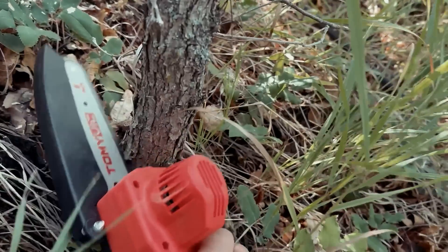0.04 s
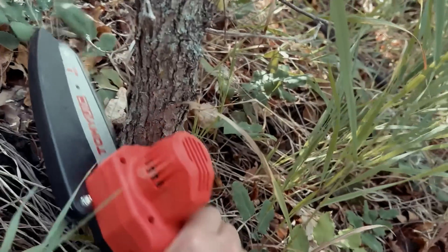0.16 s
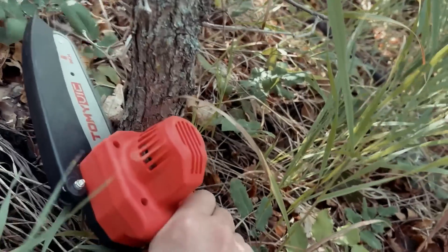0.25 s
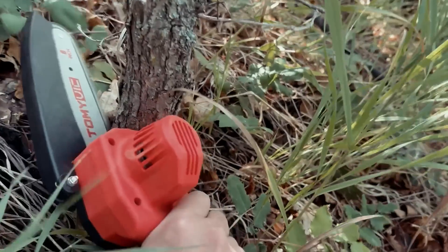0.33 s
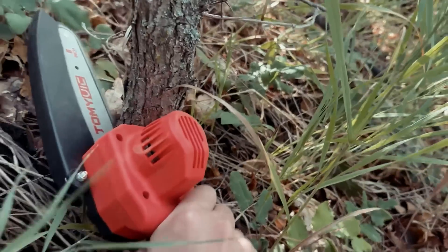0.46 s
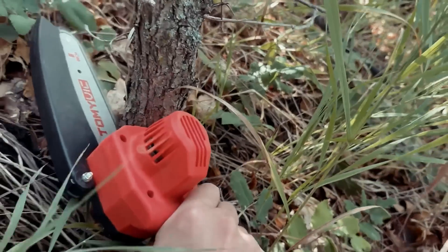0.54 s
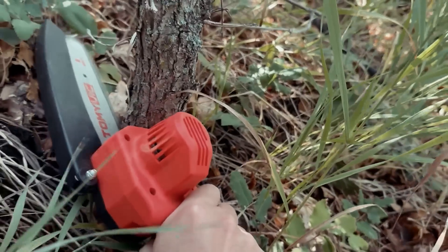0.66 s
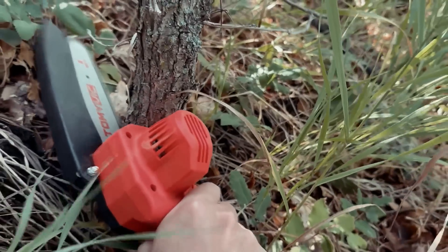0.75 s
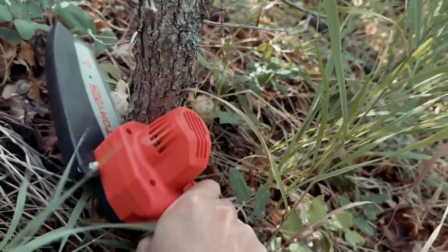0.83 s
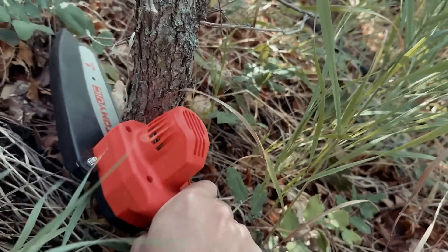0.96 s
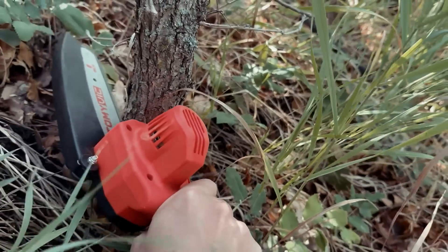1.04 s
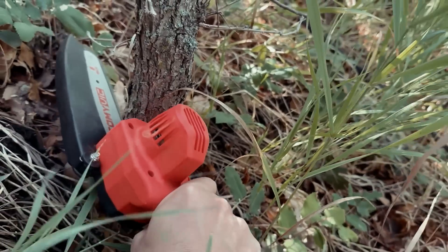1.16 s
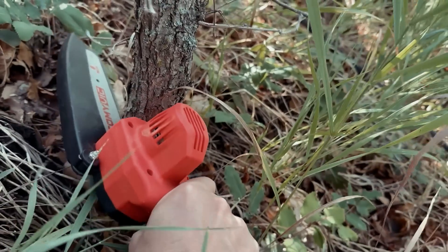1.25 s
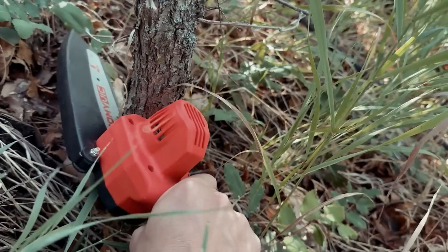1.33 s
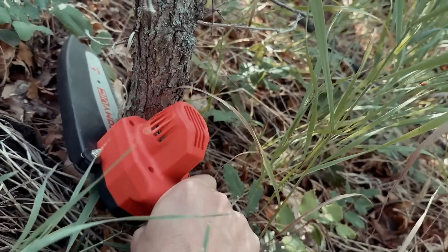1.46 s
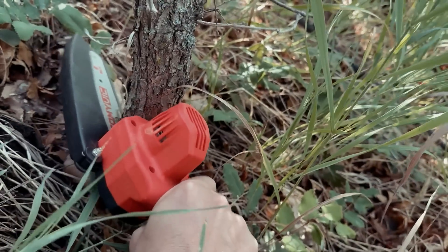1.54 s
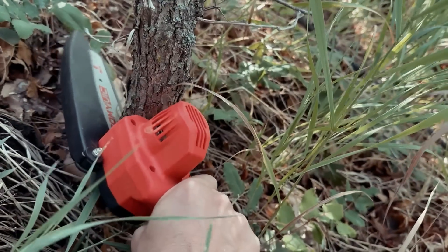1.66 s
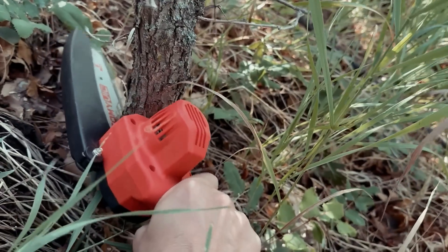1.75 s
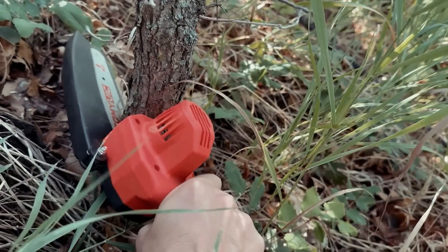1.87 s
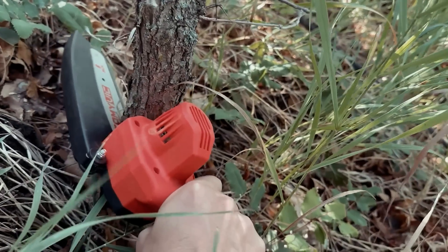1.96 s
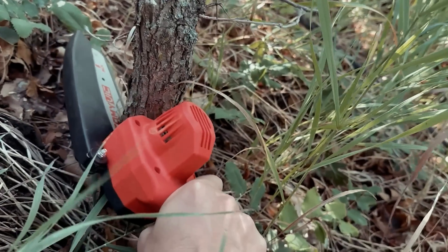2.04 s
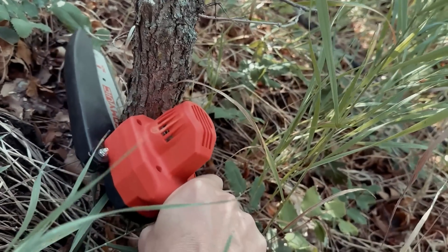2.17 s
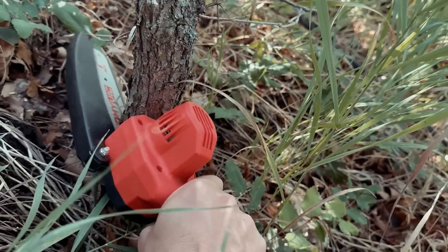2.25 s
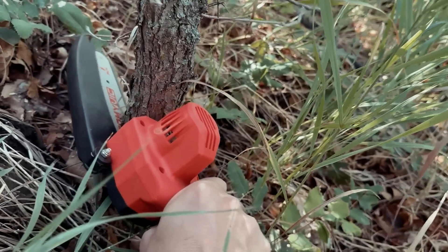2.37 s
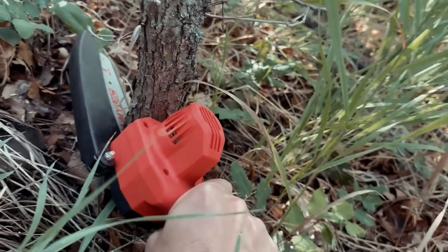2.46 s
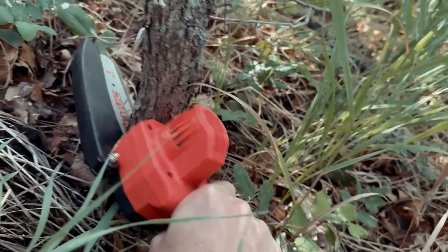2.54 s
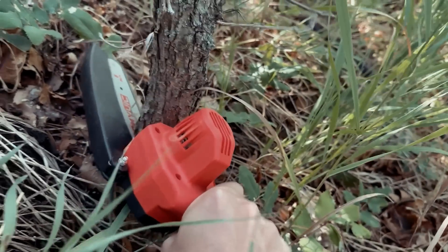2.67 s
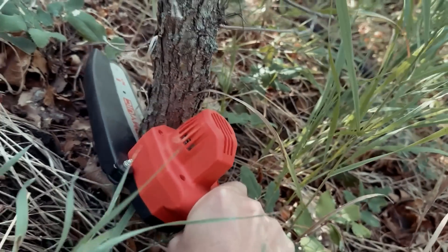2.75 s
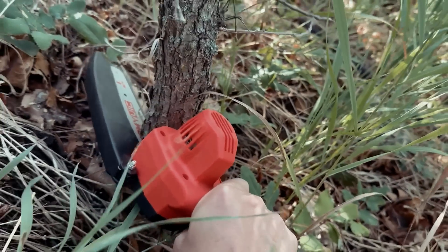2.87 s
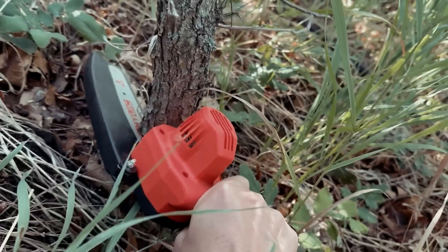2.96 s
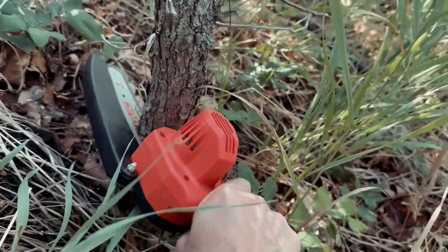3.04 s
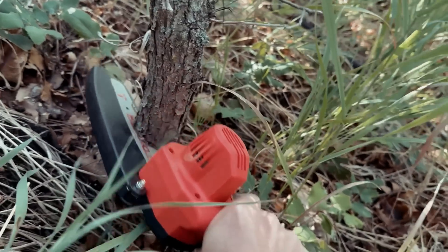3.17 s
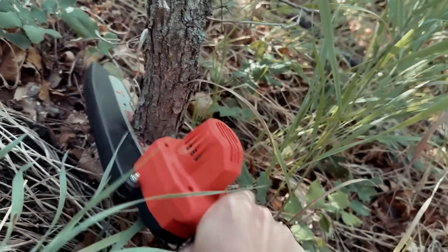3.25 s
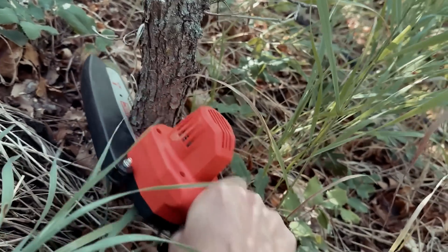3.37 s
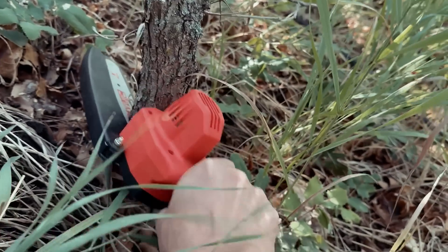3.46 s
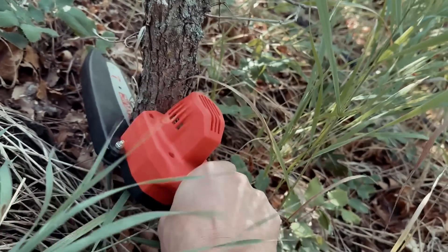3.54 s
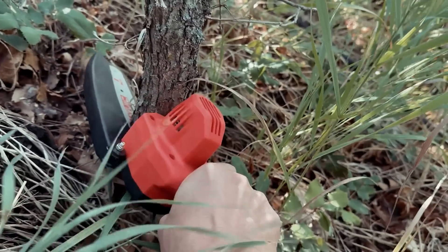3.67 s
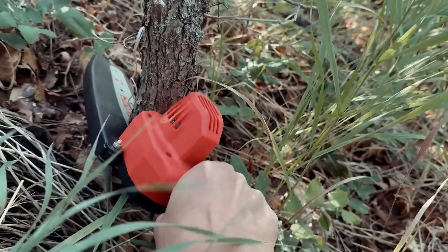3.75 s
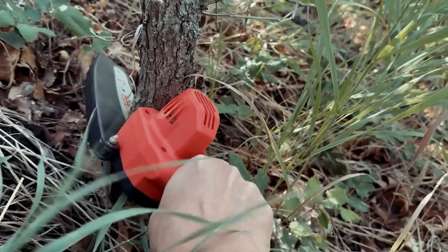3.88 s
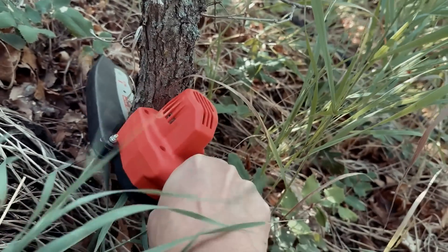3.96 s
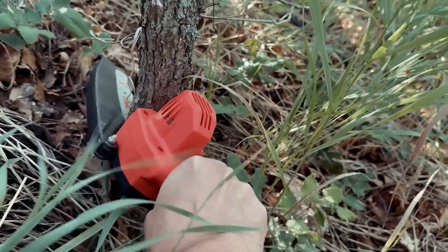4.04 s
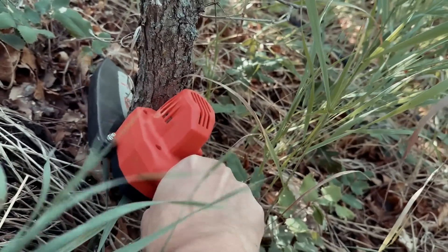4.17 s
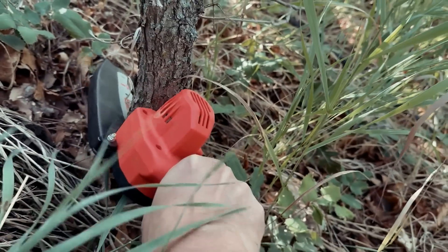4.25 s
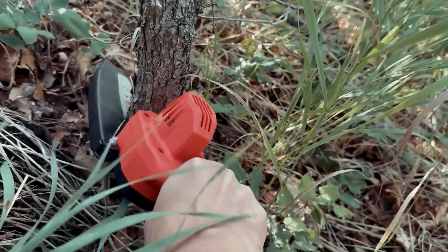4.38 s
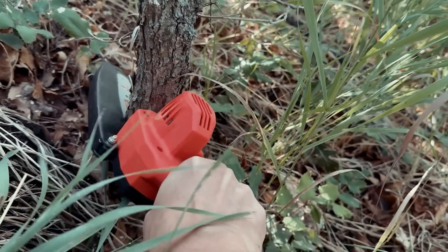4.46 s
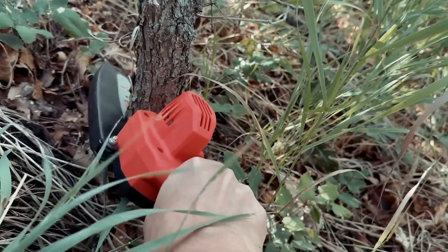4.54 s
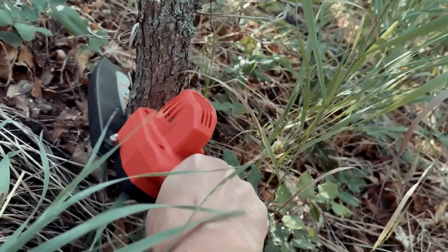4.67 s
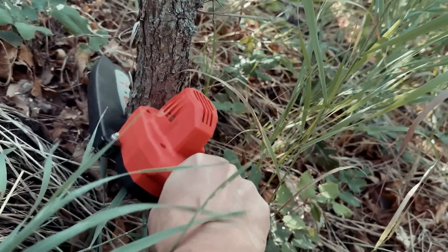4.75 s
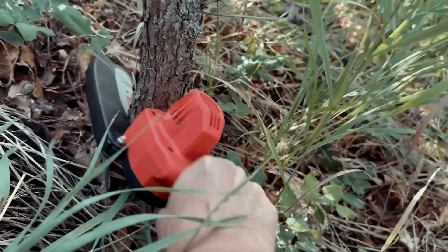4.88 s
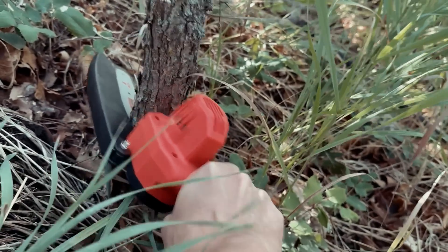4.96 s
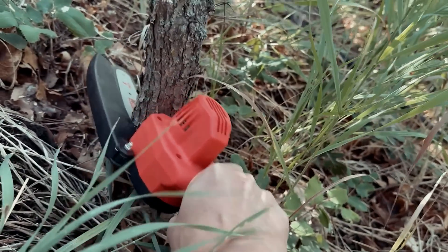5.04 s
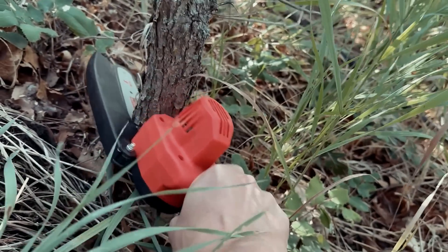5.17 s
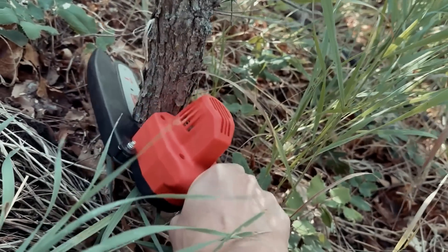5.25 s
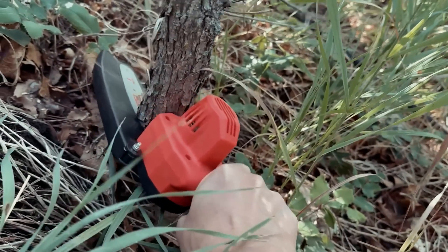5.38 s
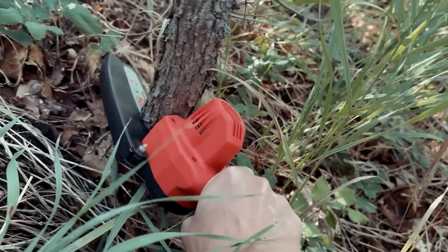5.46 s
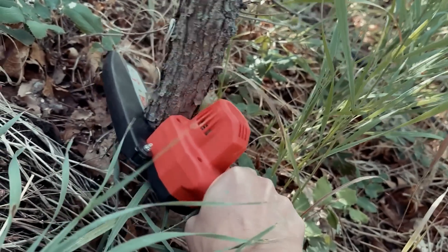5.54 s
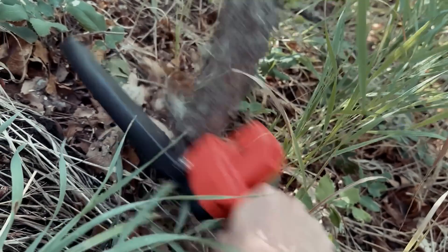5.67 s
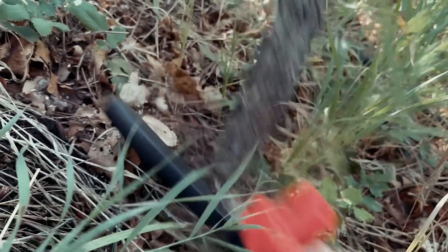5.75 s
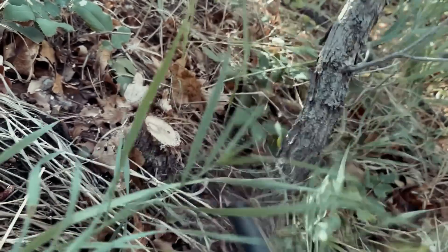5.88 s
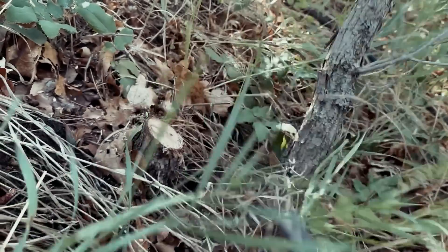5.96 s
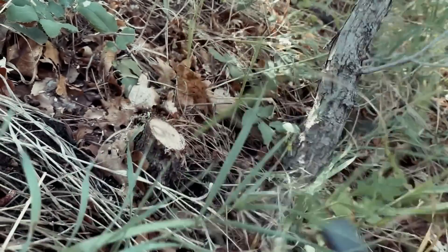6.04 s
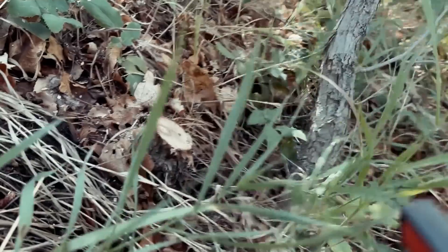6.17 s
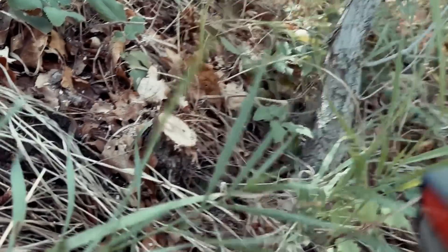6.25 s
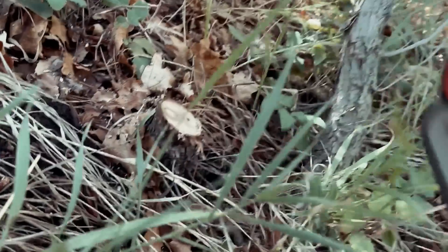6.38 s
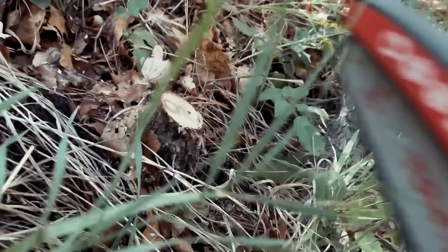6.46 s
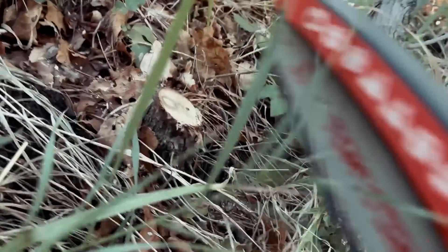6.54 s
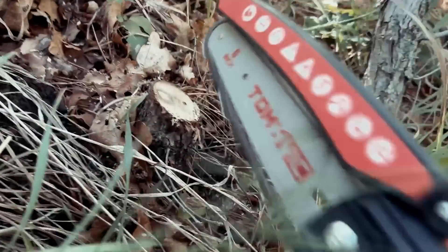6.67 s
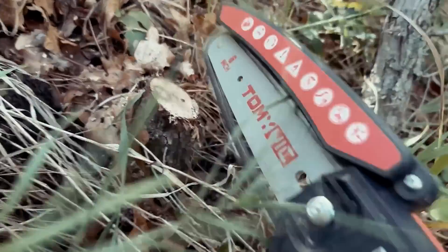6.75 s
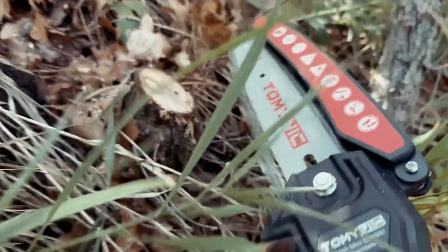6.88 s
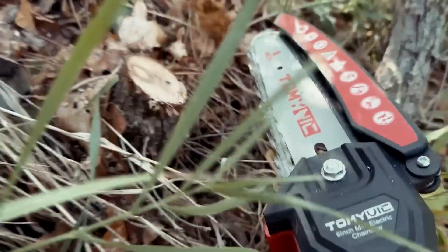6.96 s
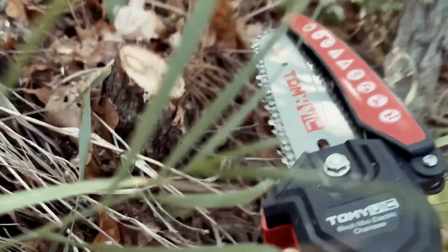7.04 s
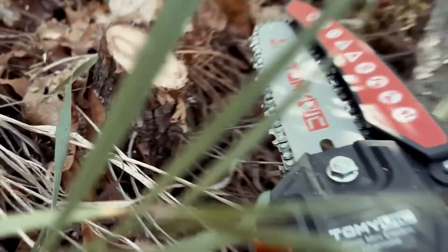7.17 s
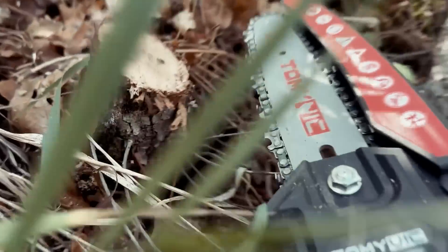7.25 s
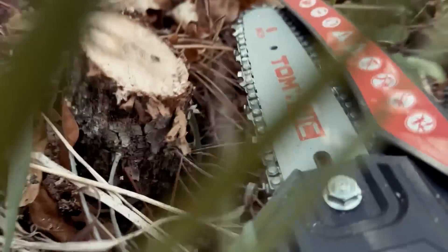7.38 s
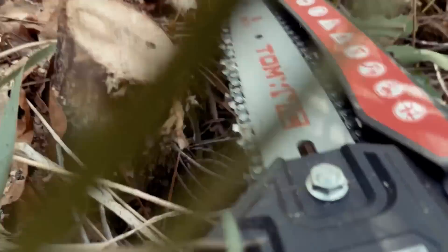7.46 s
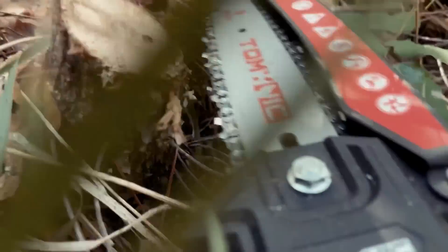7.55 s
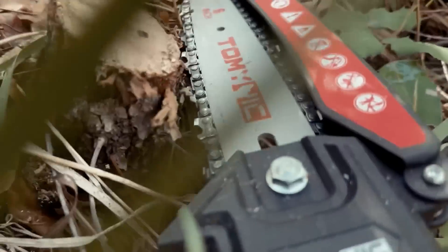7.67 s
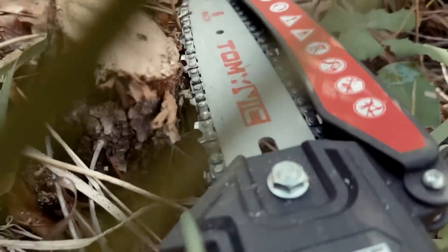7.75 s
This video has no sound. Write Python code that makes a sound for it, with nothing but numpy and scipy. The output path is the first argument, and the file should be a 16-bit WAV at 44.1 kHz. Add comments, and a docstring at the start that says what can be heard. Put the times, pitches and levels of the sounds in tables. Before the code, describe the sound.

Heard from very near in a quiet outdoor spot, a little electric chainsaw gnaws through a thin trunk with a bright metallic rattle, woody knocks and a low shudder, briefly skidding and biting again. The wood sound drops away as the cut finishes, and the chain clatters and whirrs down to a stop. Soft, tiny snaps of dry grass brushing the saw follow, over a very faint far hum.

```python
"""A chain rattles and slaps over its bar as a small battery chainsaw gnaws through a sapling close by.
Impacts excite the resonances of chain, housing and trunk; the cutters bite in throbbing groups,
knock hollow notes from the wood and make it shudder. The trunk parts at 5.6 s and the chain coasts
to rest with a falling whirr. Then dry grass rustles in tiny snaps over a faint, far hum."""
import sys
import numpy as np
from scipy import signal
from scipy.fft import rfft, irfft, next_fast_len
from scipy.io import wavfile
from scipy.ndimage import map_coordinates

SR = 44100
rng = np.random.default_rng(int(sys.argv[2]) if len(sys.argv) > 2 else 0)


def dump_mix(stems):
    """Bounce the given channels to the path in sys.argv[1] as a 16-bit WAV at rate SR."""
    frames = np.atleast_2d(stems).T  # one column per channel
    limited = np.clip(frames, -1, 1)  # hard clip at full scale
    pcm = np.round(limited * 32767).astype(np.int16)
    wavfile.write(sys.argv[1], SR, pcm)


N = 344406

# Effort of the saw; after the cut, bite is the free chain's drag: time_s, chain_db, bite_db
SAW_LEVELS = [(0.0, -25, -40.5), (0.3, -24.5, -36), (0.67, -29.5, -38.5), (0.89, -27.5, -38.5),
              (1.19, -30, -37.5), (1.94, -30.5, -40.5), (2.73, -31.5, -42), (3.02, -30.5, -44.5),
              (3.19, -28.5, -36), (3.3, -31.5, -39), (3.55, -33, -45.5), (4.09, -32, -41),
              (4.5, -33, -42.5), (4.92, -32.5, -41), (5.2, -32, -41), (5.55, -31, -41), (5.63, -36, -41),
              (5.655, -35.5, -50.5), (5.85, -37, -52.5), (5.9, -38, -58.5), (6.12, -42.5, -66.5),
              (6.44, -41.5, -70.5), (6.555, -43, -65.5), (6.7, -47, -68), (6.82, -48, -66),
              (6.974, -54, -66), (7.1, -81, -90), (7.2, -105, -110)]
# Cutters slide off the wood and bite again: rebite_s, length_s, loss_db
CUTTER_SKIDS = [(0.712, 0.04, 2), (0.755, 0.0087, 4), (2.085, 0.027, 1.5), (2.862, 0.098, 4.5),
                (3.096, 0.071, 9.5), (3.181, 0.075, 18), (3.256, .015, 9.5), (3.328, 0.059, 5.5),
                (3.763, 0.11, 4.5), (4.017, 0.23, 3.5), (4.29, 0.12, 3.5), (4.59, .015, 4),
                (5.012, .015, 7), (5.27, .05, 3), (5.611, .03, 3), (5.66, 0.034, 5)]
# The throb slows under load and deepens with even biting: time_s, bite_rate_hz, depth_ratio
CUTTER_THROB = [(0, 41.6, .6), (.7, 34.8, 1.6), (1.2, 45, 0.6), (2.0, 42, .9), (2.6, 43.5, 1.5),
                (3.3, 48, 0.92), (3.8, 43.7, 0.11), (4.3, 42, 0.94), (5.0, 39.5, 1.5), (5.5, 45, 0.91),
                (5.7, 39, 0.32), (7.1, 50, .5)]
# Hardest slaps of links on the bar: start_s, chain_db, housing_db
LINK_CATCHES = [(0.058, -2.5, -12.5), (0.168, -11.5, -38.5), (0.449, -18, -14), (0.5541, -2, -29),
                (0.6285, -8, -35.5), (0.66, -9, -31), (0.7574, -2.5, -18), (0.788, -4.5, -28),
                (0.9776, -4.5, -32), (1.3279, -6.5, -34), (1.353, -7, -24), (1.4591, -23, -16.5),
                (1.503, -14, -23), (1.6955, -9, -27), (1.7414, -12, -18), (2.1176, -20, -16),
                (2.6274, -5.5, -17.5), (2.721, -6.5, -17), (2.83, -5, -27), (3.0977, -10, -20),
                (3.1931, -7, -25), (3.258, -10, -42), (3.492, -10, -22), (4.0649, -5, -20),
                (4.361, -12, -23), (4.453, -20, -29), (4.803, -8, -29), (4.8623, -12, -13.5),
                (5.028, -7, -17.5), (5.0669, -11, -20), (5.1895, -6, -23), (5.3584, -8, -25),
                (5.4969, -7, -23), (5.612, -7, -21), (5.6937, -21, -22), (5.8633, -24, -19.5),
                (5.9511, -34.5, -26), (6.0409, -24, -42), (6.0974, -24, -39), (6.1327, -12.5, -53),
                (6.1684, -15.5, -31), (6.248, -12.5, -27), (6.3038, -13, -28), (6.5199, -21, -38),
                (6.6191, -16, -52), (6.666, -20, -44), (6.8496, -23, -33.5)]
# Hardest knocks of cutters on the trunk: start_s, level_db, pitch_hz
TRUNK_KNOCKS = [(0.146, -24.5, 850), (0.292, -23, 845), (0.502, -27.5, 775), (0.58, -25.5, 732),
                (0.6, -19, 780), (0.659, -21.5, 685), (0.765, -18, 700), (0.793, -20.5, 710),
                (0.849, -20.5, 668), (0.999, -31, 700), (1.072, -24, 958), (1.21, -24, 703),
                (1.253, -22.5, 870), (1.275, -20.5, 736), (1.335, -22, 684), (1.491, -27, 670),
                (1.536, -22.5, 643), (1.597, -26.5, 685), (1.956, -29, 684), (2.337, -22.5, 668.7),
                (2.582, -25, 704), (2.63, -22, 690), (2.861, -27, 800), (3.045, -36, 401),
                (3.101, -30, 414), (3.212, -24.5, 910), (3.494, -26.5, 626), (3.777, -25, 670),
                (4.063, -27, 942), (4.153, -30, 910), (4.246, -27, 781), (4.638, -28, 611),
                (4.744, -22, 631), (4.791, -24.5, 899), (4.891, -23.5, 650), (5.018, -28.5, 810),
                (5.289, -35, 977), (5.357, -29, 659), (5.429, -26, 865), (5.495, -25.5, 912),
                (5.862, -38, 1090), (5.868, -36.5, 463), (5.952, -49, 457)]
# Low voices swell as the hand pushes: time_s, shudder_db, thud_db, lower_note_db
PUSH_LEVELS = [(0.0, -62, -53.5, -50), (0.08, -54.5, -47.5, -49), (0.84, -43.5, -51.5, -50),
               (1.11, -54.5, -62, -46), (1.18, -49.5, -72, -51), (1.23, -42, -54.5, -45.5),
               (1.44, -50, -60, -46.5), (2.38, -48.5, -57, -51.5), (2.43, -53, -66, -46),
               (2.67, -50.5, -50.5, -50), (3.1, -63, -76, -52.5), (3.23, -49.5, -54.5, -46.5),
               (3.33, -62, -73, -44), (3.43, -48, -51, -47), (3.76, -65.5, -78, -51),
               (3.79, -39.5, -57, -47), (4.01, -64, -88, -50.5), (4.17, -47.5, -63, -40),
               (4.57, -60, -76, -40), (4.84, -45, -54, -48.5), (5.25, -47, -55.5, -48),
               (5.34, -46, -74, -51), (5.39, -41.5, -61, -48), (5.58, -43.5, -63, -45),
               (5.68, -71, -76, -65), (5.95, -74, -88, -59)]
# Bands thrown forward and shaded as the saw moves: time_s, bright_hz, bright_db, shaded_hz, shaded_db
SAW_STANCE = [(0, 3660, 5.5, 6000, 1), (.25, 3350, 1, 5880, -3.5), (.45, 3200, 6.5, 5650, -5),
              (.8, 3320, 2, 5930, -2.5), (2.5, 3660, 1.5, 6140, -2.5), (3.2, 2650, 2, 5530, -1.5),
              (4.2, 2380, 6.5, 6000, -3), (5.6, 2600, 2.5, 5470, -2), (5.66, 5480, -1, 1800, 2),
              (5.8, 7000, 8, 1670, -4), (6.1, 5300, 6, 2013, -12), (6.2, 5200, 2.5, 3600, -3.5),
              (6.6, 4500, 2, 3450, -1), (6.68, 3300, 5.5, 2000, -8), (7.1, 3050, 9.5, 2000, -9)]
# Ring of the coasting bar: time_s, pitch_hz, width_hz, level_db
BAR_RESONANCE = [(6.15, 2500, 258, -86), (6.301, 2450, 260, -58), (6.55, 2600, 258, -65),
                 (6.68, 2500, 260, -82), (6.72, 1436, 60, -80), (6.88, 1470, 60, -70),
                 (6.98, 1450, 60, -67), (7.1, 1390, 60.1, -92)]
# Whirr of the slowing sprocket: time_s, pitch_hz, level_db
SPROCKET_WHIRR = [(6.22, 4920, -89), (6.33, 4850, -56), (6.5, 4720, -56), (6.62, 4450, -64),
                  (6.68, 4400, -85)]
# Grass brushing the saw: time_s, high_rustle_db, low_rustle_db
GRASS_LEVELS = [(7.0, -58.5, -81), (7.138, -85, -102), (7.146, -73, -88), (7.158, -82, -103),
                (7.418, -81, -105), (7.49, -72, -99), (7.5, -81.5, -105), (7.572, -68, -85),
                (7.62, -72, -90), (7.672, -81.5, -105), (7.81, -94, -105)]
# A stalk sliding on the housing: time_s, level_db
STALK_RUB = [(7.05, -83), (7.12, -108), (7.2, -90), (7.376, -109), (7.404, -82), (7.428, -109), (7.5, -109)]
# Narrow dips in the treble: centre_hz, width_hz, gain_db
TREBLE_DIPS = [(8880, 500, -5), (13400, 300, -22.5)]

# Relative spectral densities, each listing: frequency_hz, level_db
RATTLE_SPECTRUM = [(4710, -29.5), (8000, -11.5), (8880, -27.5), (9970, -4), (10700, 2.5), (12300, -4.5),
                   (13400, -8), (14900, 0.5), (16000, -0.5)]   # chain on bar; also the high rustle of grass
HOUSING_SPECTRUM = [(880, -24), (1500, -10), (1590, -10), (1890, 0), (2150, -1.5), (2750, 3), (3100, 1),
                    (3720, 3), (4720, 2.5), (5610, -0.5), (7570, 0.5), (8730, -22.5), (9000, -5),
                    (11700, -43.5), (19800, -120)]   # plastic shell and gears
TRUNK_SPECTRUM = [(280, -33.5), (480, -8.5), (523, -10), (633, -1), (702, -0.5), (941, -1), (1170, -7),
                  (1340, -2), (1540, -12.5), (1900, -5), (2470, -14.5), (4180, -120)]   # trunk under the cutters
LOWER_NOTE_SPECTRUM = [(130, -23.5), (220, -5), (307, -5.5), (384, 2), (501, -5.5), (540, -6), (700, -29.5),
                       (1190, -120)]   # the trunk's lower note
DRAG_SPECTRUM = [(150, -48), (250, -25), (423, -3), (560, -12), (813, 5.5), (980, -3), (1210, -5),
                 (1320, -1), (1450, -8), (1900, -31), (2470, -34), (4180, -120)]   # free chain in the bar's groove
SHUDDER_SPECTRUM = [(59, -35), (100, -6), (124, -10.5), (167, 2.5), (215, -8.5), (300, -7.5), (390, -27.5),
                    (660, -120)]   # trunk and housing shaking
THUD_SPECTRUM = [(24, -43), (40, -24.5), (75, 7), (125, 4.5), (160, -29.5), (280, -120)]   # deep thud under the push
GRASS_SPECTRUM = [(120, -30.5), (200, 1), (220, -13.5), (328, -5), (384, -26), (473, -13.5), (1590, -24),
                  (5850, -26), (9000, -19), (11700, -43), (19800, -120)]   # low rustle of the blades
AIR_SPECTRUM = [(18, -55), (30, -27.5), (48, -11), (71, -11.5), (88, -17), (101, -1.5), (123, -5),
                (234, -42), (404, -30.5), (478, -31), (9000, -36), (11700, -68), (19800, -120)]   # quiet outdoor air

PARTED_S, SILENT_DB = 5.64, -140   # the trunk lets go of the chain; a source at rest
SKID_ONSET_SHARE, REBITE_S = .4, .01
CHAIN_THROB_DB, WOOD_THROB_DB = 1.0, 1.66   # rms of the throb's fundamental per unit depth
BITE_LEAD_TURNS = .1508   # knocks and catches start just before the throb's crest
CATCH_SHARE, CATCH_RISE_S, CATCH_T60_S = .25, .0018, .021   # share: bites with a light impact
KNOCK_SHARE, KNOCK_RISE_S, KNOCK_T60_S = .45, .0023, .024
RUB_HZ, RUB_WIDTH_HZ = 2400, 400
AIR_DB, HUM_HZ, HUM_RISE_S = -84.5, 118, 6.78


def saw():
    """Common excitation: one cutting force modulates chain, housing and trunk together."""
    chain_db, housing_db, wood_db = saw_levels()
    turns, grip_db, bite_db = cutting_force()
    metal = chain_and_housing(chain_db, housing_db, grip_db, turns)
    cut = trunk_and_drag(wood_db, bite_db, grip_db)
    rumble = shudder(wood_db, bite_db)
    metal = directivity(metal, patchy_db=1.5, patch_s=.05, patches_per_octave=9)
    cut = directivity(cut, patchy_db=2, patch_s=.03, patches_per_octave=4.5)
    return metal + cut + rumble + knocks(wood_db, turns) + coasting(grip_db)


def saw_levels():
    """Loss of contact: a skid weakens the bite and, to a lesser degree, chain and housing."""
    t = np.arange(N) / SR
    chain_db, wood_db = in_time(SAW_LEVELS)
    skid_db = np.zeros(N)
    for s, length_s, loss_db in CUTTER_SKIDS:
        corners_s = [s - length_s, s - length_s * (1 - SKID_ONSET_SHARE), s, s + REBITE_S]
        skid_db += np.interp(t, corners_s, [0, loss_db, loss_db, 0])
    chain_db, wood_db = chain_db - .21 * skid_db, wood_db - skid_db
    housing_db = chain_db - 4.5 + .24 * (wood_db - chain_db)
    return chain_db, housing_db, wood_db


def cutting_force():
    """Amplitude modulation: one throb per bite, unevenly timed, and random lumps as links pass."""
    bite_rate_hz, depth = in_time(CUTTER_THROB, outside=None)
    swing = np.abs(depth + .2 * drift(9.4))
    turns = np.cumsum(bite_rate_hz * (1 + .1 * drift(22.02))) / SR
    # the second harmonic sharpens the gap between bites
    throb = np.sqrt(2) * swing * (np.sin(2 * np.pi * turns) + .39 * np.cos(4 * np.pi * turns))
    lumps_db = .35 * drift(12) + 1.8 * drift(130)
    return turns, CHAIN_THROB_DB * throb + lumps_db, WOOD_THROB_DB * throb + lumps_db


def chain_and_housing(chain_db, housing_db, grip_db, turns):
    """Impact excitation: running links rattle bar and shell, and catching links slap both."""
    at, draws = chance_bites(turns, CATCH_SHARE, until_s=SAW_LEVELS[-1][0])
    excess_db = 11.75 + 7 * draws   # light catches stand out from the running level
    _, hard_chain_db, hard_housing_db = np.transpose(LINK_CATCHES)
    chain = body(RATTLE_SPECTRUM, chain_db - .8, grip_db,
                 per_s=2000, spread_db=6.4, hiss=1.6, flicker_db=.42)
    chain += from_db(-11) * catches(RATTLE_SPECTRUM, hard_chain_db, at, chain_db[at] + excess_db[:, 0])
    housing = body(HOUSING_SPECTRUM, housing_db - .8, 1.06 * grip_db,
                   per_s=1500, spread_db=7.2, hiss=1.8, flicker_db=.39)
    slaps = catches(HOUSING_SPECTRUM, hard_housing_db, at, housing_db[at] + excess_db[:, 1])
    return chain + housing + from_db(-9) * slaps


def catches(spectrum, hard_db, light_at, light_db):
    """Impulse response: each slap of a link is a fast-decaying noise burst in the body's colour."""
    t, blows = np.arange(SR // 10) / SR, np.zeros(N)
    blows[light_at] = from_db(light_db)
    blows[[round(row[0] * SR) for row in LINK_CATCHES]] = from_db(hard_db)
    envelope = from_db(-60 * t / CATCH_T60_S) * np.minimum(t / CATCH_RISE_S, 1)
    return signal.fftconvolve(blows, envelope)[:N] * noise(spectrum)


def trunk_and_drag(wood_db, bite_db, grip_db):
    """Forced vibration: cutters drive the trunk until it parts, leaving the free chain's friction."""
    *_, lower_db = in_time(PUSH_LEVELS)
    wood = body(TRUNK_SPECTRUM, wood_db, bite_db, per_s=500, spread_db=3.5, hiss=2.3, flicker_db=.69)
    lower_note = body(LOWER_NOTE_SPECTRUM, np.minimum(lower_db, wood_db - 5), 1.2 * bite_db,
                      per_s=300, spread_db=1.4, hiss=2.2, flicker_db=1.1)
    drag = body(DRAG_SPECTRUM, wood_db, grip_db, per_s=600, spread_db=5.2, hiss=1.8, flicker_db=.85)
    cutting = np.clip((PARTED_S + .23 - np.arange(N) / SR) / .084, 0, 1)
    return cutting * (wood + lower_note) + (1 - cutting) * drag


def knocks(wood_db, turns):
    """Free vibration: each knock rings two close, quickly damped modes of the trunk."""
    out, t = np.zeros(N), np.arange(SR // 10) / SR
    envelope = from_db(-60 * t / KNOCK_T60_S) * (1 - np.exp(-t / KNOCK_RISE_S))
    at, draws = chance_bites(turns, KNOCK_SHARE, until_s=PARTED_S)
    light_db = wood_db[at] + 3 + 8 * draws[:, 0]
    light_hz = np.interp(draws[:, 1], [0, 1], [587, 975])
    blows = [*TRUNK_KNOCKS, *zip(at / SR, light_db, light_hz)]
    for (s, level_db, hz), (phase, spacing, upper_phase) in zip(blows, rng.random((400, 3))):
        lower = np.sin(2 * np.pi * (hz * t + phase))
        upper = np.sin(2 * np.pi * (hz * (1.1 + .3 * spacing) * t + upper_phase))
        out[round(s * SR):][:len(t)] += from_db(level_db + 3.5) * envelope * (lower + .5 * upper)
    return out


def shudder(wood_db, bite_db):
    """Low-frequency forcing: trunk and housing shake with the bites and thud as the hand pushes."""
    shudder_db, thud_db, _ = in_time(PUSH_LEVELS)
    shudder_db = np.clip(shudder_db, wood_db - 21.5, wood_db - 2.5)   # tied to the bite or drag
    force = rng.standard_normal(N) * from_db(1.3 * bite_db + 1.3 * drift(10))
    shaking = from_db(shudder_db) * colour(force, SHUDDER_SPECTRUM)
    return shaking + from_db(thud_db) * noise(THUD_SPECTRUM)


def directivity(x, patchy_db, patch_s, patches_per_octave):
    """Directional radiation: the moving saw favours one band and shades another; modes vary by chance."""
    hz, s, frames = signal.stft(x, SR, nperseg=1024, noverlap=768)
    octave = np.log2(np.maximum(hz, 50) / 50)[:, None]
    time_s, bright_hz, bright_db, shaded_hz, shaded_db = np.transpose(SAW_STANCE)
    gain_db = 0
    for centre_hz, band_db, width_octaves in ((bright_hz, bright_db, .25), (shaded_hz, shaded_db, .2)):
        away = octave - np.log2(np.interp(s, time_s, centre_hz) / 50)
        gain_db += np.interp(s, time_s, band_db) * np.exp(-(away / width_octaves) ** 2)
    grid = np.broadcast_arrays(octave * patches_per_octave, s / patch_s)
    gain_db += patchy_db * map_coordinates(rng.standard_normal((100, 800)), grid, order=1, mode="wrap")
    return signal.istft(frames * from_db(gain_db), SR, nperseg=1024, noverlap=768)[1][:N]


def coasting(grip_db):
    """Resonance and rotation: the bar rings in one band; the sprocket's pitch falls with its speed."""
    ring_hz, width_hz, ring_db = in_time(BAR_RESONANCE)
    widths_hz = [row[2] for row in BAR_RESONANCE]
    narrow_hz, broad_hz = min(widths_hz), max(widths_hz)
    broad = np.interp(width_hz, [narrow_hz, broad_hz], [0, 1])
    ring = broad * narrow_band(ring_hz, broad_hz) + (1 - broad) * narrow_band(ring_hz, narrow_hz)
    whirr_hz, whirr_db = in_time(SPROCKET_WHIRR)
    whirr = narrow_band(whirr_hz, width_hz=280)
    return from_db(grip_db) * (from_db(ring_db) * ring + from_db(whirr_db) * whirr)


def grass():
    """Friction: dry blades brush the saw in clumped tiny snaps; one stalk rubs with a hollow tone."""
    high_db, low_db = in_time(GRASS_LEVELS)
    snaps = contacts(per_s=3000, spread_db=4.5, hiss=.8) * from_db(3.3 * drift(25))
    rub_spectrum = [(RUB_HZ - 2 * RUB_WIDTH_HZ, -20), (RUB_HZ, 0), (RUB_HZ + RUB_WIDTH_HZ, -20)]
    rub = from_db(in_time(STALK_RUB)[0]) * noise(rub_spectrum)
    high_rustle = from_db(high_db) * colour(snaps, RATTLE_SPECTRUM)
    low_rustle = from_db(low_db) * colour(snaps, GRASS_SPECTRUM)
    return high_rustle + low_rustle + rub


def air():
    """Ambient noise: a quiet broadband floor and a far, wavering hum, fainter at first."""
    hum_db = np.where(np.arange(N) / SR < HUM_RISE_S, -100, -89)
    return from_db(AIR_DB) * noise(AIR_SPECTRUM) + from_db(hum_db) * narrow_band(HUM_HZ, width_hz=14)


def body(spectrum, level_db, grip_db, per_s, spread_db, hiss, flicker_db):
    """Source and filter: contacts, modulated by the grip, pass through a body's resonances."""
    force = contacts(per_s, spread_db, hiss) * from_db(grip_db + flicker_db * drift(80))
    return from_db(level_db) * colour(force, spectrum)


def contacts(per_s, spread_db, hiss):
    """Shot noise: random impulses of very uneven size on a bed of friction hiss."""
    sizes = from_db(spread_db * np.minimum(rng.exponential(1, N), 3)) * rng.choice([-1, 1], N)
    return rms_one(sizes * (rng.random(N) < per_s / SR)) + hiss * rng.standard_normal(N)


def chance_bites(turns, share, until_s):
    """Random thinning: sample numbers of a share of the bites, with two uniform draws for each."""
    at = np.flatnonzero(np.diff(np.floor(turns - .25 + BITE_LEAD_TURNS)) > 0)
    draws = rng.random((500, 3))[:len(at)]
    picked = (draws[:, 0] < share) & (at < until_s * SR)
    return at[picked], draws[picked, 1:]


def narrow_band(hz, width_hz):
    """Quadrature modulation: noise crowded round a pitch that may move."""
    phase = 2 * np.pi * np.cumsum(hz * np.ones(N)) / SR
    return drift(width_hz) * np.sin(phase) + drift(width_hz) * np.cos(phase)


def noise(spectrum):
    """Gaussian noise with the given spectrum, at unit rms."""
    return colour(rng.standard_normal(N), spectrum)


def colour(x, spectrum):
    """Linear filtering: impose a spectrum, closed beyond its ends, at unit rms."""
    size = next_fast_len(N)
    points_hz, points_db = np.transpose(spectrum)
    hz = np.maximum(np.fft.rfftfreq(size, 1 / SR), 1)
    gain_db = np.interp(np.log(hz), np.log(points_hz), points_db, -120, -120)
    return rms_one(irfft(rfft(x, size) * from_db(gain_db), size)[:N])


def drift(rate_hz):
    """Random fluctuation: noise twice through a one-pole low-pass, at unit rms."""
    pole = np.exp(-2 * np.pi * rate_hz / SR)
    return rms_one(signal.lfilter([1], [1, -2 * pole, pole * pole], rng.standard_normal(N + SR))[SR:])


def in_time(rows, outside=SILENT_DB):
    """Linear interpolation: table columns as curves at every sample."""
    time_s, *columns = np.transpose(rows)
    return [np.interp(np.arange(N) / SR, time_s, column, outside, outside) for column in columns]


def rms_one(x):
    """Normalisation to unit rms."""
    return x / np.sqrt(np.mean(x ** 2) + 1e-20)


def from_db(db):
    """Decibels as an amplitude ratio."""
    return 10 ** (np.asarray(db) / 20)


def scene():
    """Superposition: saw, grass and air add in one channel."""
    background = air()
    return (saw() + grass() + background)[None]


def record(dry):
    """Overall tone shaping: two narrow treble dips, a low cut and a steep top cut."""
    size = next_fast_len(N)
    hz = np.fft.rfftfreq(size, 1 / SR)
    gain_db = sum(dip_db * np.exp(-((hz - centre_hz) / width_hz) ** 4)
                  for centre_hz, width_hz, dip_db in TREBLE_DIPS)
    dipped = irfft(rfft(dry, size) * from_db(gain_db), size)[:, :N]
    low_cut = signal.butter(3, 58, "high", fs=SR, output="sos")
    top_cut = signal.ellip(12, .5, 80, 15760, fs=SR, output="sos")
    return signal.sosfilt(top_cut, signal.sosfilt(low_cut, dipped))


dry = scene()
out = record(dry)
dump_mix(out)
```